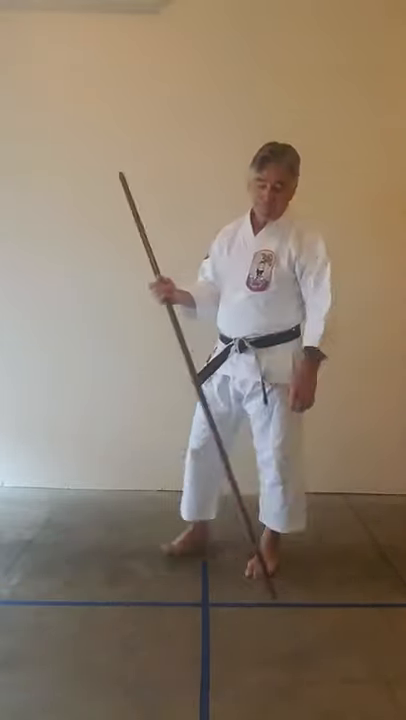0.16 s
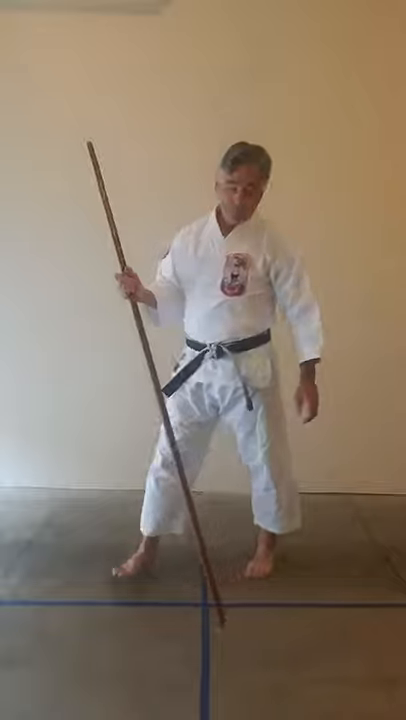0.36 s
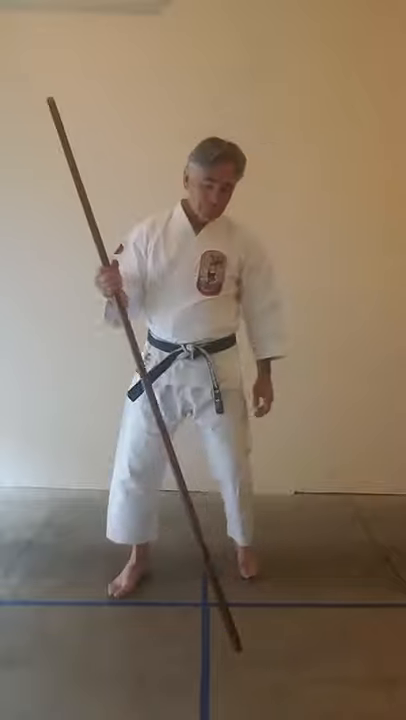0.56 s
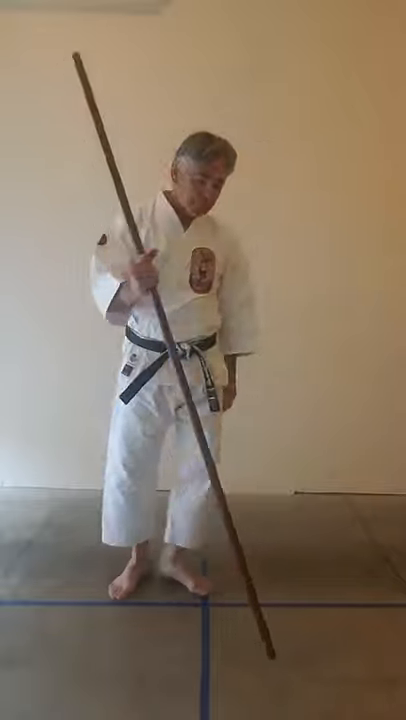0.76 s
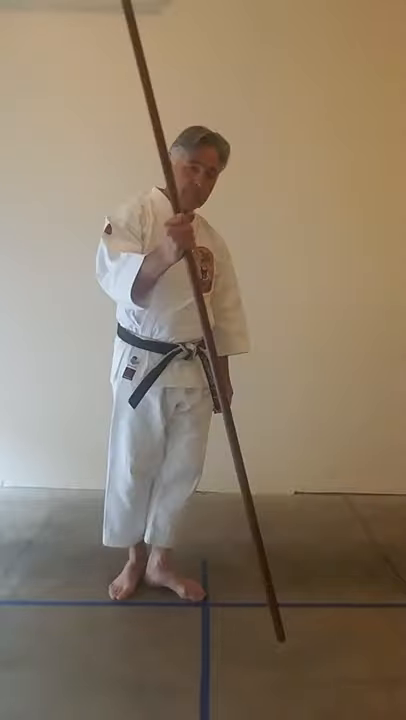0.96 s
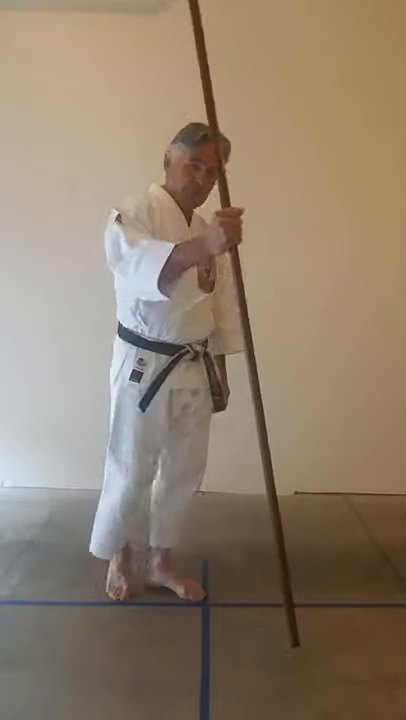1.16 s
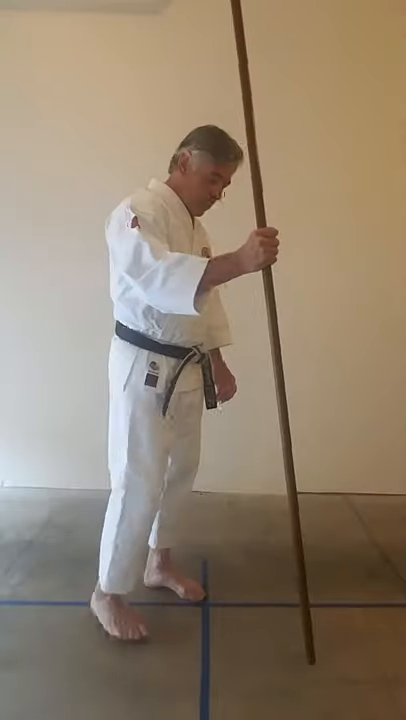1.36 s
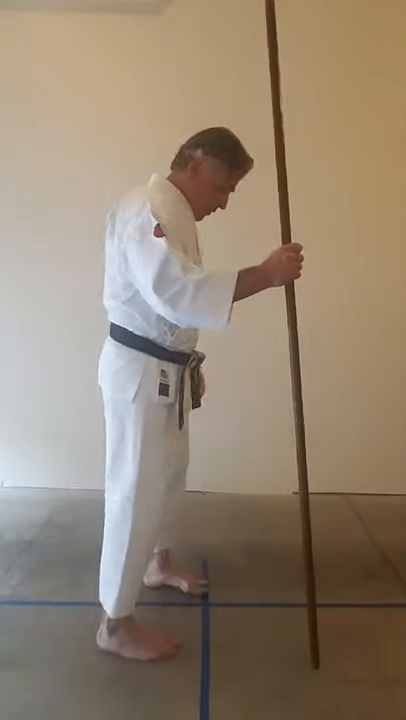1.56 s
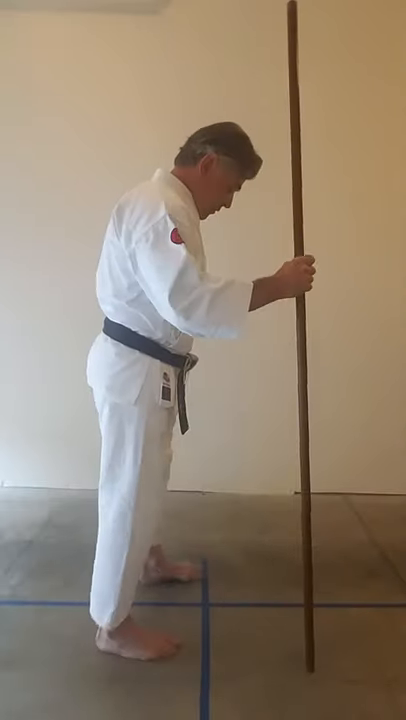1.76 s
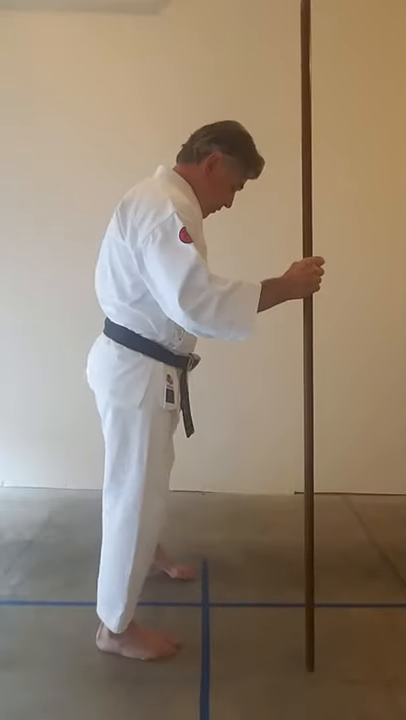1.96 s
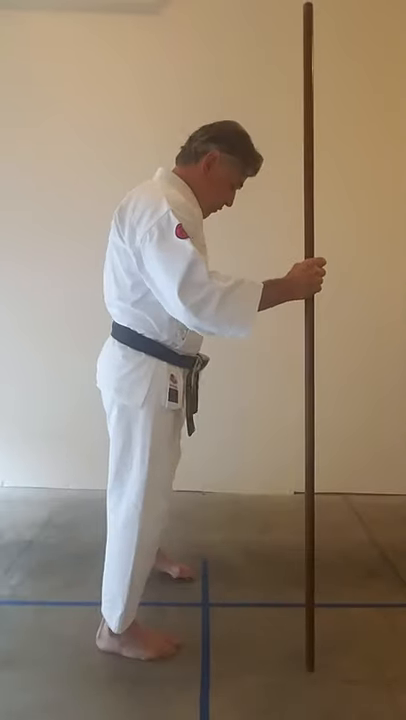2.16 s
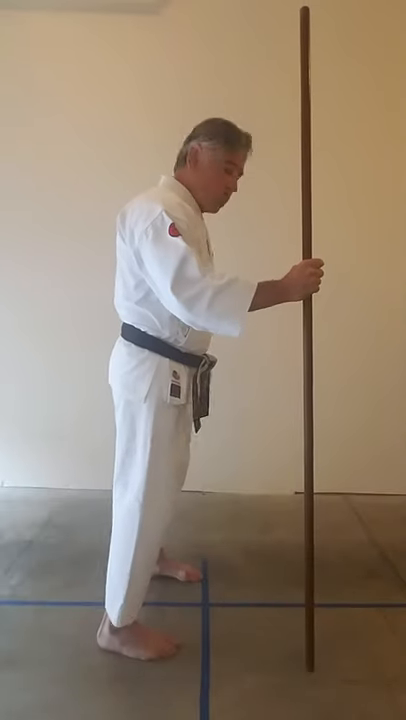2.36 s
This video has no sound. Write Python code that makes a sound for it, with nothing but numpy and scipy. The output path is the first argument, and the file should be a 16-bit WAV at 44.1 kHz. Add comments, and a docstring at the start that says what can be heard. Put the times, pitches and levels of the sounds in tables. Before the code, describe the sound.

A long wooden staff knocks once on concrete at about 1.76 s: a hard, bright clack with a short, hand-damped woody ring, gritty crack and low thud, echoing about half a second in a bare room. Before it, dull barefoot pats at 0.27 and 0.63 s, faint deep heel bumps, and airy foot and cotton swishes, strongest near 0.8, 1.0 and 1.5 s. Low room rumble and faint hiss throughout.

```python
"""A long wooden staff, set upright, knocks once on the concrete floor of a bare, echoing room.
The knock sums damped bending modes, hard contact pulses, a noise crack and a short sine thud.
Before it, bare feet step as dull pulses with faint deep heel bumps; feet and heavy cotton swish as shaped noise.
Coloured noise makes a faint room rumble and hiss; the left microphone port is brighter than the right."""
import sys
import numpy as np
from scipy import signal
from scipy.fft import rfft, irfft, next_fast_len
from scipy.io import wavfile
from scipy.ndimage import map_coordinates

SR = 44100
rng = np.random.default_rng(int(sys.argv[2]) if len(sys.argv) > 2 else 0)


def waveform_to_disk(signal):
    """Save audio, clipped to [-1, 1], as 16-bit WAV at the path in sys.argv[1]."""
    frames = np.transpose(np.atleast_2d(signal))
    scaled = np.clip(frames, -1, 1) * 32767
    samples = np.round(scaled).astype(np.int16)
    wavfile.write(sys.argv[1], SR, samples)


N = 105928


def amp(db):
    """Decibels to gain."""
    return 10 ** (np.asarray(db) / 20)


def unit(x):
    """Scale to rms 1."""
    return x / np.sqrt(np.mean(x ** 2) + 1e-20)


def along(points, hz):
    """Interpolate (Hz, value) points on a log frequency axis."""
    point_hz, value = np.transpose(points)
    return np.interp(np.log(hz + 1), np.log(point_hz + 1), value)


def filtered(x, response):
    """Multiply the spectrum of x by a response of frequency, zero-padded against wrap-around."""
    size = x.shape[-1]
    padded = next_fast_len(size + SR // 2)
    spectrum = rfft(x, padded) * response(np.fft.rfftfreq(padded, 1 / SR))
    return irfft(spectrum, padded)[..., :size]


def pulse(colour, size=4096):
    """Minimum-phase pulse of a (Hz, dB) colour, by folding the cepstrum."""
    gain = amp(along(colour, np.fft.rfftfreq(size, 1 / SR)))
    cepstrum = irfft(np.log(gain))
    cepstrum[1:size // 2] *= 2
    cepstrum[size // 2 + 1:] = 0
    return irfft(np.exp(rfft(cepstrum)))


def wobble(rate_hz):
    """Smooth random curve: a spline through rate_hz random knots a second."""
    knots = rng.standard_normal(int(N * rate_hz / SR) + 4)
    return map_coordinates(knots, [np.arange(N) * rate_hz / SR])


def add(track, start_s, sound):
    """Mix a sound into the track at a time."""
    part = track[:, max(0, round(start_s * SR)):][:, :sound.shape[-1]]
    part += sound[..., :part.shape[1]]


# left-right correlation of the diffuse field: freq [Hz], correlation [-1..1]
FIELD_CORRELATION = [(90, 0.98), (220, 0.94), (420, 0.57), (800, 0.084), (1700, -0.21), (3000, -0.017),
                     (6000, 0.026)]


def diffuse(size):
    """Stereo noise from all around: the mid/side balance sets the correlation at each frequency."""
    def mid_side_gains(hz):
        angle = np.arccos(np.clip(along(FIELD_CORRELATION, hz), -1, 1)) / 2
        return np.array([np.cos(angle), np.sin(angle)])

    mid, side = filtered(rng.standard_normal((2, size)), mid_side_gains)
    return np.array([mid + side, mid - side])


def coloured_noise(colour, size):
    """Diffuse noise of a (Hz, dB) colour, at rms 1."""
    return unit(filtered(diffuse(size), lambda hz: amp(along(colour, hz))))


DIRECT_DB, WALLS_DB = -8.5, -16.5
# first echoes off the near walls: delay [s], left [gain], right [gain], before WALLS_DB
WALL_ECHOES = [(.0035, .4, .7), (.0098, .6, 1.1), (.0118, .6, 1.2), (.0146, .9, 1.2), (.019, .6, .8),
               (.028, 0.8, 0.49)]
# decay time of the room: freq [Hz], t60 [s]
ROOM_DECAY = [(100, 0.4), (250, 0.57), (1000, 0.69), (2500, 0.54), (5000, 0.51), (12000, 0.39)]


def in_room(sound, room_db, build_s):
    """Convolve with direct sound, wall echoes and a diffuse tail; build_s holds the tail's early density."""
    hz, t, z = signal.stft(diffuse(SR), SR, nperseg=256)
    age_s = np.hypot(t, build_s) - build_s
    decay_db = -60 * age_s / along(ROOM_DECAY, hz)[:, None]
    tail = signal.istft(z * amp(decay_db), SR, nperseg=256)[1]
    answer = amp(room_db) * unit(tail) / np.sqrt(tail.shape[1])
    answer[:, 0] += amp(DIRECT_DB)
    for delay_s, left_gain, right_gain in WALL_ECHOES:
        add(answer, delay_s, amp(WALLS_DB) * np.array([[left_gain], [right_gain]]))
    return signal.fftconvolve(sound[None], answer, axes=1)


AIR_DB, AIR_WAVER_DB, AIR_WAVER_HZ = -55.5, -1, 7.97
# spectrum of the still room air: freq [Hz], relative density [dB per Hz]
AIR_COLOUR = [(20, -20), (45, -13), (70, -3.5), (95, -6), (122, 3.5), (160, -3.5), (300, -9.5),
              (600, -13.5), (1500, -19.5), (3000, -26), (7000, -21.5), (12300, -27), (16000, -26)]


def air():
    """Low room rumble under a faint hiss: coloured noise, wavering slightly."""
    level_db = AIR_DB + AIR_WAVER_DB * wobble(AIR_WAVER_HZ)
    return amp(level_db) * coloured_noise(AIR_COLOUR, N)


SWISH_FALL_DB_PER_S = 86
SWISH_GRAIN_DB, SWISH_GRAIN_HZ = 0.5, 81  # uneven rubbing
SWISH_PAN_DB = 0.3  # left up, right down
# slides of feet and cloth: start_s [s], rise_s [s], hold_s [s], level_db [dB]
SLIDES = [(-.05, .02, 0.032, -60), (0.445, 0.023, 0.14, -56), (0.781, 0.047, 0.045, -46),
          (0.971, 0.026, 0.051, -50.5), (1.09, 0.034, 0.016, -58), (1.184, 0.013, 0.012, -59),
          (1.484, 0.029, 0.018, -50.5), (1.65, 0.0061, 0.018, -52)]
# rubbing noise: freq [Hz], relative level [dB]
SWISH_COLOUR = [(200, -16), (1000, -4), (2500, -6.5), (3600, -5), (4800, 3), (5800, 1), (6700, 5.5),
                (7800, 3), (12000, 3), (16000, -6.5)]


def swishes():
    """Rubbing noise: each slide swells, holds and falls at a steady dB rate; powers add."""
    t, power = np.arange(N) / SR, np.zeros(N)
    for start_s, rise_s, hold_s, level_db in SLIDES:
        fall_db = SWISH_FALL_DB_PER_S * np.maximum(t - start_s - rise_s - hold_s, 0)
        rise = np.clip((t - start_s) / rise_s, 0, 1)
        power += (rise * amp(level_db - fall_db)) ** 2
    grain = amp(SWISH_GRAIN_DB * wobble(SWISH_GRAIN_HZ))
    rub = grain * coloured_noise(SWISH_COLOUR, N)
    return np.sqrt(power) * rub * amp([[SWISH_PAN_DB], [-SWISH_PAN_DB]])


HEEL_HZ, HEEL_SWELL_S = 67, 0.012
# weight shifting onto a heel: start_s [s], level_db [dB]
HEEL_BUMPS = [(0.404, -54.5), (0.578, -54.5), (0.894, -59), (1.055, -51.5), (1.226, -49), (1.31, -51.5),
              (1.396, -53.5)]


def heels():
    """Faint, deep bump as weight comes down: a sine that swells quickly and decays."""
    out, t = np.zeros((2, N)), np.arange(SR // 4) / SR
    swell = t / HEEL_SWELL_S * np.exp(1 - t / HEEL_SWELL_S)
    bump = swell * np.sin(2 * np.pi * HEEL_HZ * t)
    for start_s, level_db in HEEL_BUMPS:
        add(out, start_s, amp(level_db) * bump)
    return out


STEP_ROOM_DB, STEP_BUILD_S = 0.5, .008  # the feet sound drier than the staff
# soft footfalls: start_s [s], level_db [dB], before the room
FOOTFALLS = [(.267, -11), (0.295, -16.5), (0.613, -15.5), (.636, -10)]
# bare sole on concrete: freq [Hz], level [dB]
SOLE_COLOUR = [(30, -7), (100, -4.5), (320, 7.5), (700, -5), (1500, -9), (2600, -14), (4000, -34),
               (16000, -55)]


def steps():
    """Bare soles pat the concrete: dull pulses in the room."""
    out = np.zeros((2, N))
    for start_s, level_db in FOOTFALLS:
        add(out, start_s, amp(level_db) * in_room(pulse(SOLE_COLOUR), STEP_ROOM_DB, STEP_BUILD_S))
    return out


KNOCK_S, KNOCK_DB = 1.7648, 7  # KNOCK_DB scales ring and first contact only
RING_DB, CONTACT_DB = -36, -1
ROOM_DB, ROOM_BUILD_S = 5, 0.087
SETTLE_S, SETTLE_DB = 0.00111, -9  # the rim lands first, then the flat of the end
CRACK_DB, CRACK_T60_S = -19, 0.015  # grit crushed under the end
THUD_HZ, THUD_T60_S, THUD_DB = 419.3, 0.013, -20  # dull push of the sudden stop
# bending modes of the staff: pitch_hz [Hz], relative level_db [dB], t60_s [s]
STAFF_MODES = [(215, -12, 0.03), (305, -2.5, 0.056), (438.5, -8, 0.087), (557.6, -4.5, 0.075),
               (975, -17.5, 0.15), (1201, -1.5, 0.051), (1680, -2.5, 0.08), (1952, -4.5, 0.092),
               (2229, -6.5, 0.069), (2500, -2, 0.097), (2816, 1.5, 0.07), (3100, -2.5, 0.058),
               (3437, -6, 0.1), (3826, -9, 0.075), (4330, -1, 0.027)]
# contact too slow to drive the treble: freq [Hz], level [dB]
RING_COLOUR = [(4000, -2), (7500, -11.5), (11000, -8), (16000, -20)]
# hard contact of wood on concrete: freq [Hz], relative level [dB]
CONTACT_COLOUR = [(30, -31), (70, -8), (140, 7), (450, 7), (850, -7), (1500, -4.5), (2800, -4.5),
                  (4400, -9), (5400, -9.5), (7300, -10), (10000, -24.5), (12700, -26.5), (16000, -45)]
# crushed grit: freq [Hz], relative level [dB]
CRACK_COLOUR = [(1500, -29), (3400, -2), (4500, 16), (5300, -10), (6200, -8), (9000, -17), (12500, -11),
                (16000, -27)]


def staff():
    """A hard double contact sets the hand-damped staff ringing briefly, with a crack and a short thud."""
    out, t = np.zeros((2, N)), np.arange(SR // 2) / SR
    ring = np.zeros(len(t))
    for pitch_hz, level_db, t60_s in STAFF_MODES:
        ring += amp(level_db - 60 * t / t60_s) * np.cos(2 * np.pi * pitch_hz * t)
    blow = amp(RING_DB) * signal.fftconvolve(ring, pulse(RING_COLOUR))
    contact = pulse(CONTACT_COLOUR)
    blow[:len(contact)] += amp(CONTACT_DB) * contact
    crack = amp(CRACK_DB - 60 * t / CRACK_T60_S) * coloured_noise(CRACK_COLOUR, len(t))
    thud = amp(THUD_DB - 60 * t / THUD_T60_S) * np.sin(2 * np.pi * THUD_HZ * t)
    add(out, KNOCK_S, -amp(KNOCK_DB) * in_room(blow, ROOM_DB, ROOM_BUILD_S))
    # second contact, crack and thud stay dry
    add(out, KNOCK_S + SETTLE_S, amp(SETTLE_DB) * contact)
    add(out, KNOCK_S, crack)
    add(out, KNOCK_S, -thud)
    return out


def scene():
    """Sum of all sources, background to main."""
    return air() + swishes() + heels() + steps() + staff()


TOP_HZ = 15850
# colour of the microphone ports, with a dip near 9 kHz: freq [Hz], left [dB], right [dB]
PORT_COLOURS = [(59, 0, 3), (414, 0.4, 1.9), (1110, 2.5, 4), (1800, 5.5, 5.5), (2790, 2.5, 9),
                (4200, 2.5, -4), (5800, 1, -1), (7200, 3.5, -11), (8300, -11, -9.5), (9540, -12.5, -10),
                (11110, 3.5, -5), (12600, 5.5, -3.5), (16100, -6, -2)]


def record(dry):
    """Each port colours its channel; nothing is kept from TOP_HZ up."""
    hz, left_db, right_db = np.transpose(PORT_COLOURS)
    ports = np.array([pulse(np.column_stack([hz, side_db])) for side_db in (left_db, right_db)])
    coloured = signal.fftconvolve(dry, ports, axes=1)[:, :N]
    return filtered(coloured, lambda f: f < TOP_HZ)


dry = scene()
out = record(dry)
waveform_to_disk(out)
```